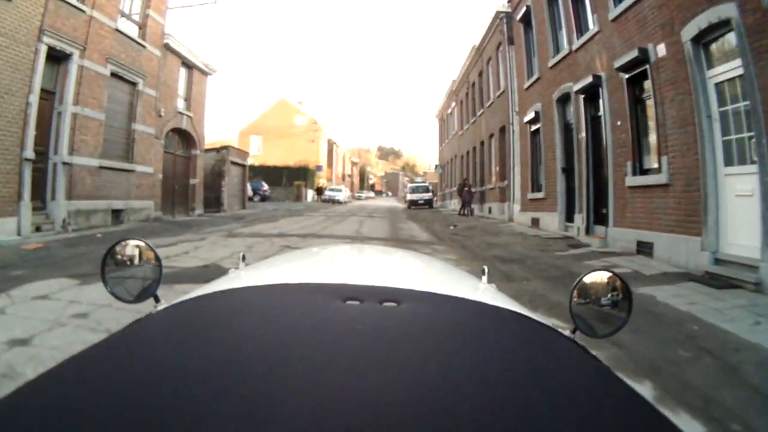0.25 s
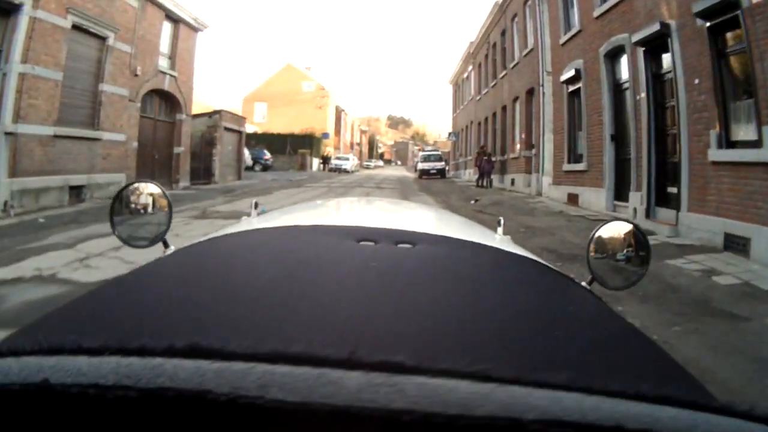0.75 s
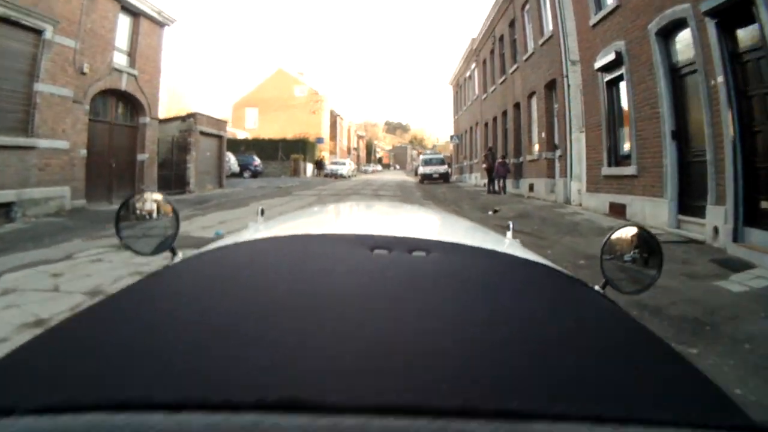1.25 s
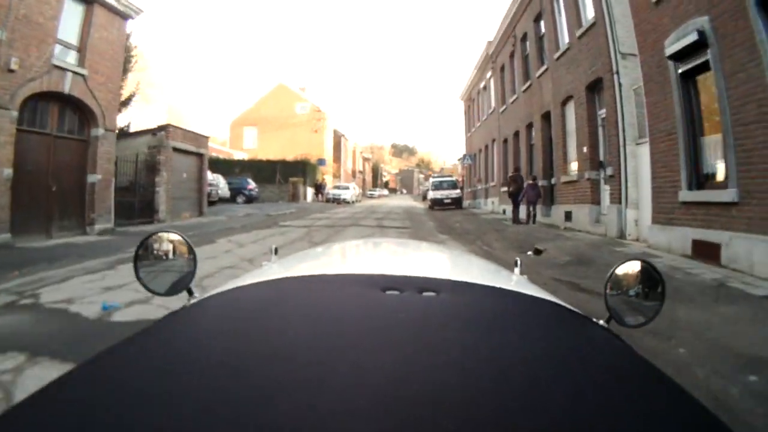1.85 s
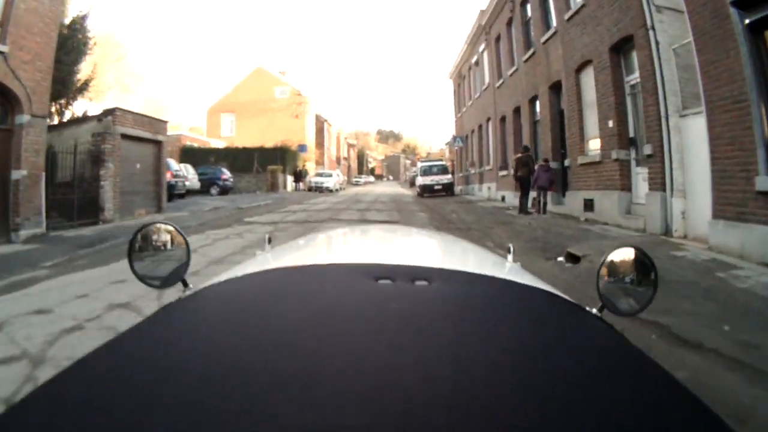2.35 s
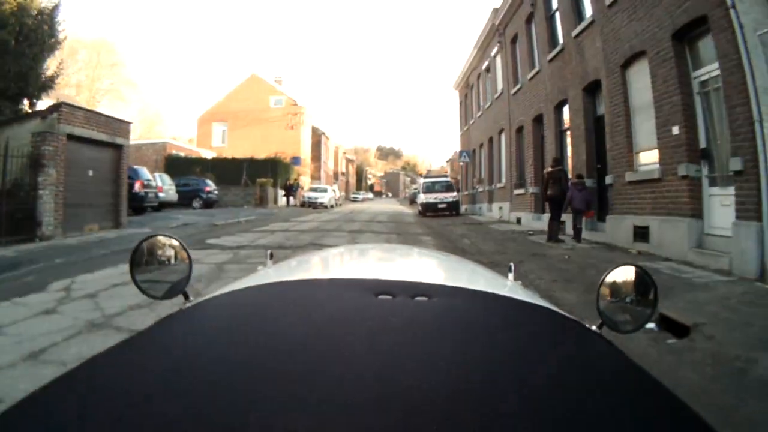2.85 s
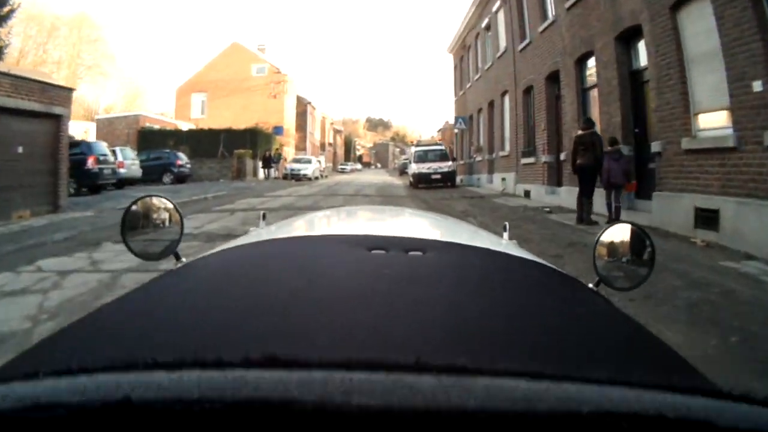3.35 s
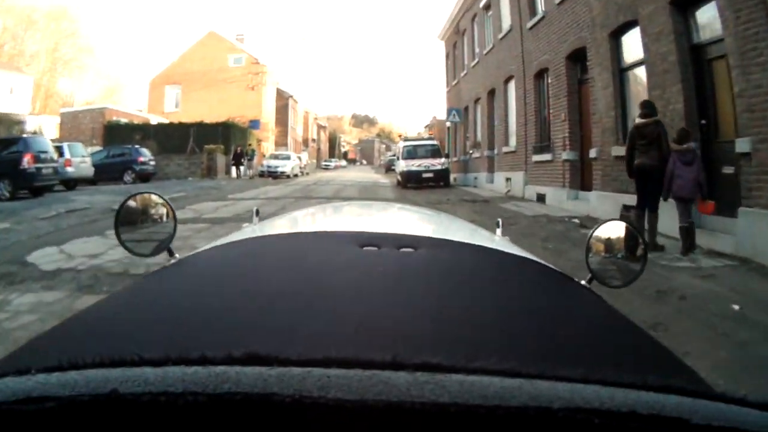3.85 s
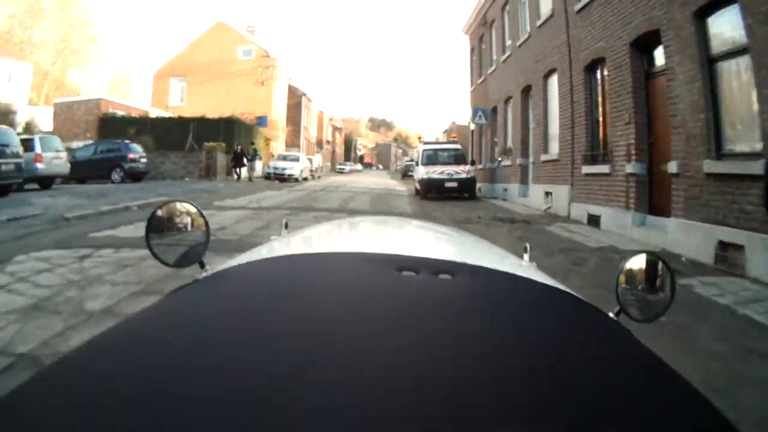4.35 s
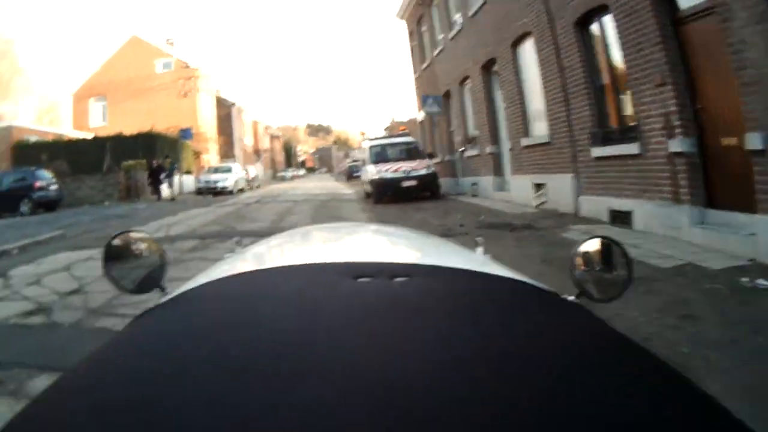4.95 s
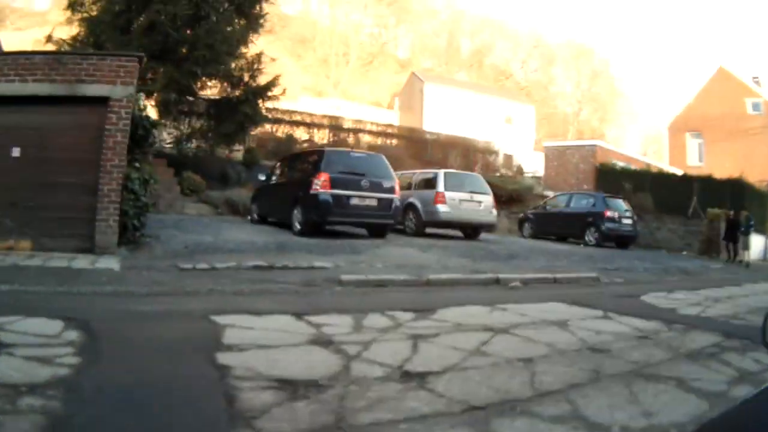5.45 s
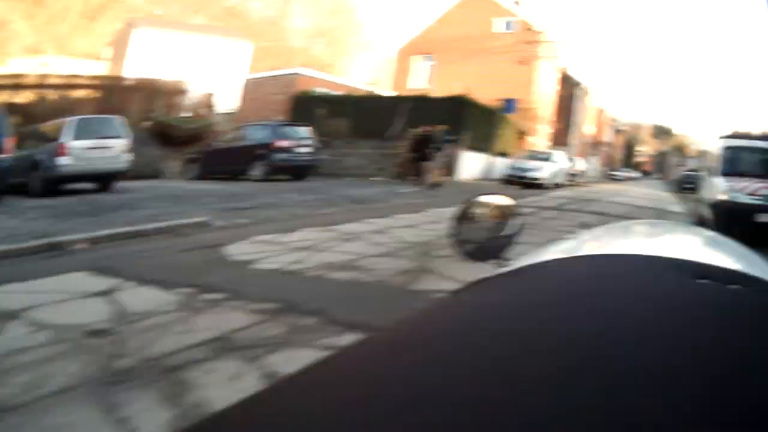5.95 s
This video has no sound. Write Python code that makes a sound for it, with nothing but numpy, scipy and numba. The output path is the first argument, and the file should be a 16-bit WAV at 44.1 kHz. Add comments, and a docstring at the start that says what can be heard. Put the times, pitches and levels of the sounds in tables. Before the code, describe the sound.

Close on the body of a small pedal car outdoors, low rumble, hollow droning and loose chatter swell over broken paving while a chain swishes with quick pedal strokes. Light knocks pass by. Then a wheel drops into a pothole: a hard, clipped bang with ringing panels and deep thumps, followed by more rattling bumps.

```python
"""A pedal car's thin hollow shell rumbles, drones and chatters along a broken street, miked on its own body.
Shaped noise makes the rumble; tiny random impacts make the drone, the chatter and the swish of the chain.
About four and a half seconds in, a wheel drops into a pothole: decaying noise bangs and rings the panels,
low sine swings flex the body, and the sound overloads the microphone and rattles on over more bumps."""
import sys
import numpy as np
from scipy import signal
from scipy.fft import rfft, irfft
from scipy.io import wavfile
from scipy.ndimage import uniform_filter1d
from numba import njit

SR = 44100
rng = np.random.default_rng(int(sys.argv[2]) if len(sys.argv) > 2 else 0)


def master_out(mix):
    """Clip the mix to full scale and print it as 16-bit PCM to the path in sys.argv[1]."""
    frames = np.transpose(np.atleast_2d(mix))
    ceiling = np.clip(frames, -1, 1)
    pcm = np.round(ceiling * 32767).astype(np.int16)
    wavfile.write(sys.argv[1], SR, pcm)


N = 273420
T = np.arange(N) / SR


def undb(db):
    """Decibels to amplitude gain."""
    return 10 ** (np.asarray(db) / 20)


def unit(x):
    """Scale to an rms of one."""
    return x / np.sqrt(np.mean(x ** 2))


def control(points):
    """A curve through (t/s, value) points, at every sample."""
    return np.interp(T, *np.transpose(points))


def colour(x, points):
    """Minimum-phase filter through (f/Hz, level/dB) points that keeps the power of white noise."""
    size = 16384
    hz, db = np.transpose(points)
    grid = np.maximum(np.fft.rfftfreq(size, 1 / SR), 1)
    skirt = np.minimum(hz[-1] / grid, 1) ** 2  # falls away above the last point
    gain = skirt * undb(np.interp(np.log(grid), np.log(hz), db))
    # folding the cepstrum forward in time makes the filter causal
    cepstrum = irfft(np.log(gain))
    cepstrum[1:size // 2] *= 2
    cepstrum[size // 2 + 1:] = 0
    response = irfft(np.exp(rfft(cepstrum)))
    return signal.fftconvolve(x, response / np.linalg.norm(response))[:N]


def contacts(per_s, spread_db):
    """Tiny impacts at random times, of either sign and uneven size."""
    hits = rng.random(N) < per_s / SR
    signs = rng.choice([-1, 1], N)
    sizes = undb(spread_db * rng.standard_normal(N))
    return unit(hits * signs * sizes)


def walk(rate):
    """Slow random wander with an rms of one, from smoothed steps at the given rate in Hz."""
    step = int(SR / rate)
    steps = np.repeat(rng.standard_normal(N // step + 1), step)
    return unit(uniform_filter1d(steps, step)[:N])


def panels(x):
    """The thin shell under a force x: each panel mode rings as a decaying sine."""
    # panel modes of the shell: f/Hz, time to fall by 60 dB/s, relative level/dB at equal decay energy
    modes = [(185, 0.23, 10), (225, .2, -20), (363, 0.12, 19), (446, 0.29, 12), (514, 0.89, 3),
             (677, 0.14, 5.5), (775, 0.14, 13), (848, 0.035, -11), (1250, 0.35, -7), (1371, 0.052, 10),
             (1492, 0.07, 10), (1583, 0.089, -2), (1740, 0.058, -2), (2230, 0.057, -11)]
    t = T[:SR // 2]
    ring = np.zeros(len(t))
    for hz, t60, db in modes:
        decay = np.exp(-np.log(1000) * t / t60)
        ring += undb(db) / np.sqrt(t60) * np.sin(2 * np.pi * hz * t) * decay
    return signal.fftconvolve(x, ring / np.linalg.norm(ring))[:N]


def push():
    """The even pedal rhythm: 1 in the middle of a push, -1 at the dead point."""
    first_push_s, stroke_s = 0.2, .365
    return np.cos(2 * np.pi * (T - first_push_s) / stroke_s)


def patches():
    """Rumble and chatter swell and ebb, in dB, as the wheels cross each broken patch."""
    # broken paving: middle t/s, half length/s (lift falls to 1/e), rumble lift/dB, chatter lift/dB
    paving = [(0.36, 0.039, 0, -3.5), (0.854, .07, 3.5, -5), (1.33, 0.044, 5, 5), (1.677, 0.067, 4, 3),
              (2.03, 0.04, -1, 3.5), (2.413, .07, 6.5, 4), (2.927, 0.034, 7, 1), (4.734, 0.11, 5.5, 9),
              (5.20, 0.055, 4.5, 6), (5.29, 0.039, -1, 4), (5.61, 0.1, 4.5, 6), (5.774, 0.052, -1, 6.5),
              (5.916, 0.027, -7.5, -1.5)]
    middle_s, half_s, rumble_db, chatter_db = np.transpose(paving)
    crossing = np.exp(-((T[:, None] - middle_s) / half_s) ** 2)
    return crossing @ rumble_db, crossing @ chatter_db


def rolling():
    """Rough pavement shakes the body, drums on its panels and makes loose parts chatter."""
    # colours of body shake, panel drumming and loose parts: f/Hz, relative level/dB
    rumble_colour = [(12, -7.5), (25, -3), (40, -1), (55, -1.5), (85, -6.5), (110, -15.5), (150, -17),
                     (220, -37.5)]
    drone_colour = [(70, -19.5), (110, 3.5), (145, -1), (230, -4), (320, -9), (430, -11.5), (600, -17.5),
                    (800, -23.5), (1300, -28.5), (3000, -109)]
    chatter_colour = [(300, -10), (600, 3), (760, -3.5), (870, 2), (1080, -5), (1300, -3.5), (1560, 2),
                      (1900, -2.5), (2200, -13.5), (2600, -20), (4000, -29), (8000, -58)]
    # coarseness of the asphalt, lifting all three layers: t/s, level/dB
    coarseness = [(0, 2.5), (.75, -2), (1.3, 0), (2.6, -1), (3.3, 1), (3.9, -.5), (4.4, 3), (5.1, 1),
                  (6.2, 0)]
    rumble_db, drone_db, chatter_db = -23, -32, -44.5  # levels before the road's lifts
    drone_share = 0.41  # part of a patch's rumble lift that reaches the drumming
    chatter_swing_db = 2.0  # how far the pedal pushes shake the loose parts
    shake_db, rattle_db = patches()

    rumble = colour(rng.standard_normal(N), rumble_colour)
    # level out the noise's own swells over 0.12 s, before the road and a slow wander shape it
    rumble = rumble / np.sqrt(uniform_filter1d(rumble ** 2, int(.12 * SR)))
    rumble = rumble * undb(rumble_db + shake_db + 1.13 * walk(rate=12))

    drone = colour(contacts(per_s=1800, spread_db=3.0), drone_colour)
    drone = drone * undb(drone_db + drone_share * shake_db)

    grit = contacts(per_s=2000, spread_db=1.0) * undb(1.7 * walk(rate=40))
    chatter = colour(grit, chatter_colour) + undb(-13.5) * panels(grit)
    chatter = chatter * undb(chatter_db + rattle_db + chatter_swing_db * push())
    return undb(control(coarseness)) * (rumble + drone + chatter)


def chain():
    """Links tick through their guides, louder on each pedal push, and slap about on bumps."""
    # colour of the ticking links: f/Hz, relative level/dB
    link_colour = [(900, 1), (1700, 11), (2300, 4.5), (2700, -4), (3000, 0.5), (3350, -8.5), (3900, -6),
                   (4700, -18), (7000, -22), (14000, -34)]
    # effort on the pedals: t/s, level/dB
    effort = [(0, -2), (1.0, -2), (1.7, -2), (2.05, 2), (2.75, -1), (3.85, -4), (4.4, 4), (5.0, 2.5),
              (5.6, 4), (6.2, 0)]
    # bumps that throw the chain against its guides: onset t/s, peak of the added gain/dB
    slaps = [(2.295, -49), (2.375, -42.5), (4.695, -42.5), (4.785, -42), (4.942, -54), (5.575, -46)]
    chain_db, swing_db = -51.5, 3  # level before effort, and swing of each stroke
    swell_s = 0.013  # time a slap takes to swell
    gain = undb(chain_db + control(effort) + swing_db * push())
    for s, db in slaps:
        age = np.maximum(T - s, 0) / swell_s
        gain = gain + undb(db) * age * np.exp(1 - age)
    return colour(contacts(per_s=1800, spread_db=2.5), link_colour) * gain


def crackles():
    """The hardest shakes bring short dry clicks, bursts of noise that do not ring the shell."""
    # dry clicks: middle t/s, burst level/dB
    clicks = [(4.383, -37.5), (4.4948, -33), (4.5105, -29), (4.517, -31), (4.523, -25), (4.535, -30),
              (4.552, -38), (4.608, -38), (4.684, -29), (4.734, -40.5), (5.539, -32.5)]
    # colour of the clicks: f/Hz, relative level/dB
    click_colour = [(800, -9.5), (2500, 6.5), (5000, -1.5), (9000, -5), (15000, -7)]
    half_s = 0.00077
    bursts = sum(undb(db) * np.exp(-((T - s) / half_s) ** 2) for s, db in clicks)
    return colour(bursts * rng.standard_normal(N), click_colour)


def jolts():
    """The body flexes as a damped low sine, a cycle or two after each dip in the road."""
    # jolts of the whole body: onset t/s, bounce f/Hz, envelope peak level/dB
    dips = [(1.83, 40, -10.5), (2.165, 40, -13), (2.877, 42.5, -8.5), (4.356, 35.3, -7), (4.487, 115, 1.5),
            (4.500, 79, 0.5), (4.511, 81.6, -2), (4.547, 48.7, -9), (4.665, 40, -3.5), (4.741, 41, -9),
            (5.518, 38.5, -4.5), (5.55, 29, -7.5)]
    out = np.zeros(N)
    for s, hz, db in dips:
        cycles = np.maximum(T - s, 0) * hz
        swell = cycles / 0.5  # the envelope peaks after half a cycle
        envelope = swell ** 2 * np.exp(2 * (1 - swell))
        out += undb(db) * envelope * np.sin(2 * np.pi * cycles)
    return out


def knocks():
    """Panel buzzes on frame at each blow: noise swells and dies as clack, hollow knock and longer boom."""
    # blows: t/s, force level/dB, ring time constant/s, knock level/dB and boom level/dB re force
    blows = [(.485, -35, .012, -11, 5), (1.632, -39.5, .012, 12, -5), (1.674, -30.5, 0.0086, 1, 3),
             (1.812, -31, 0.0053, -9, -2), (2.345, -42.5, .02, 7, 15), (3.198, -34.5, 0.011, 5.5, -2),
             (4.476, -11.5, 0.0063, -11, -20), (4.492, -21, .017, 7, 10.5), (4.506, -2, 0.012, -5.5, -3.5),
             (4.519, -4, 0.017, -6, -7), (4.530, -2.5, 0.0093, -5, -12.5), (4.552, -29, 0.033, 3, 17.5),
             (4.630, -40, 0.017, 15, 6), (4.701, -26.5, 0.015, 5.5, -2), (4.766, -30, 0.014, 0, -7),
             (4.793, -28, 0.022, -0.5, 4), (4.860, -34, .014, -7, -11), (4.949, -21, 0.0077, -1.5, -10),
             (5.536, -30, 0.0038, 10, -14), (5.557, -32, 0.015, 2, 9), (5.595, -28.5, 0.016, 5, 5),
             (5.659, -28, 0.0061, -4, -9), (5.733, -23, .007, -1.5, -18)]
    # colours of clack, hollow knock and boom: f/Hz, relative level/dB
    clack_colour = [(400, -16), (900, -12), (1250, -4.5), (1560, 9.5), (1750, 2.5), (2050, 3),
                    (2450, -11.5), (3000, -18.5), (3500, -20), (4500, -33), (6000, -54), (9000, -84)]
    hollow_colour = [(200, -29.5), (400, 7.5), (600, -6), (950, -1.5), (1200, -2.5), (1600, -13),
                     (2500, -19), (5000, -52)]
    boom_colour = [(60, -25), (110, -3), (170, -1), (280, -6.5), (400, -18.5), (700, -15), (1300, -36),
                   (3000, -96)]
    rise_s = 0.0016  # the tyre softens each strike
    clack, knock, boom = np.zeros((3, N))
    t = T[:SR // 3]
    for s, db, ring_s, knock_db, boom_db in blows:
        buzz, flex, shake = rng.standard_normal((3, len(t)))
        start = int(s * SR)
        span = slice(start, start + len(t))
        force = undb(db) * (1 - np.exp(-t / rise_s))
        decay = np.exp(-t / ring_s)
        clack[span] += force * buzz * decay
        knock[span] += force * undb(knock_db) * flex * decay
        boom[span] += force * undb(boom_db) * shake * np.exp(-t / (2.06 * ring_s))
    hard = undb(-3.0) * colour(clack, clack_colour)
    ringing = undb(-7) * panels(clack)
    return hard + ringing + colour(knock, hollow_colour) + colour(boom, boom_colour)


def scene():
    """Everything that reaches the microphone on the shell, from the road to the blows."""
    return (rolling() + chain() + crackles() + jolts() + knocks())[None]


@njit
def follow(x, attack, release):
    """Level follower that moves by one fraction per sample when rising, another when falling."""
    out, level = np.empty(len(x)), 0.
    for i in range(len(x)):
        level += (x[i] - level) * (attack if x[i] > level else release)
        out[i] = level
    return out


def gain_control(x, top_db, attack_s, release_s):
    """Turn the sound down while its followed level passes the threshold."""
    level = follow(np.abs(x), 1 / (attack_s * SR), 1 / (release_s * SR))
    return x / np.maximum(level / undb(top_db), 1)


def record(dry):
    """The microphone's path hisses, ducks too late for the bang, flattens peaks and cuts the top."""
    # colour of the hiss: f/Hz, relative level/dB
    hiss_colour = [(100, 6), (3000, 1), (6000, -1.5), (10000, -3), (15000, -4.5)]
    hiss_db, ceiling, top_hz = -57, .68, 15600  # hiss level ahead of the gain control
    x = dry[0] + undb(hiss_db) * colour(rng.standard_normal(N), hiss_colour)
    x = gain_control(x, top_db=-8.0, attack_s=0.024, release_s=0.27)
    x = np.clip(x, -ceiling, ceiling)
    # order 8, 0.2 dB ripple, 70 dB stopband
    lowpass = signal.ellip(8, .2, 70, top_hz, fs=SR, output="sos")
    return signal.sosfilt(lowpass, x)[None]


dry = scene()
out = record(dry)
master_out(out)
```